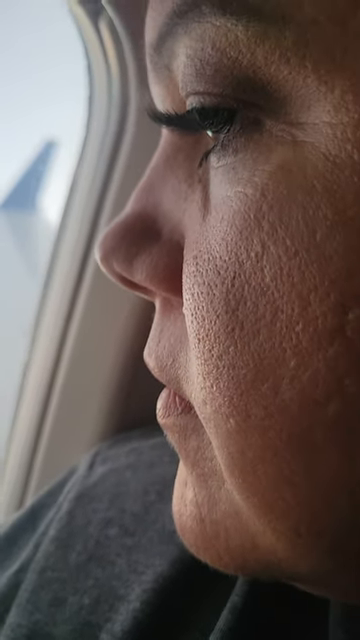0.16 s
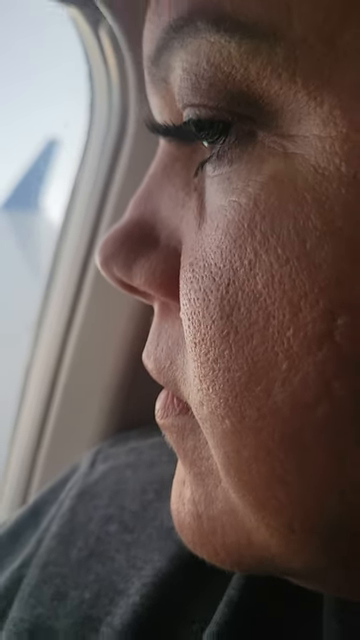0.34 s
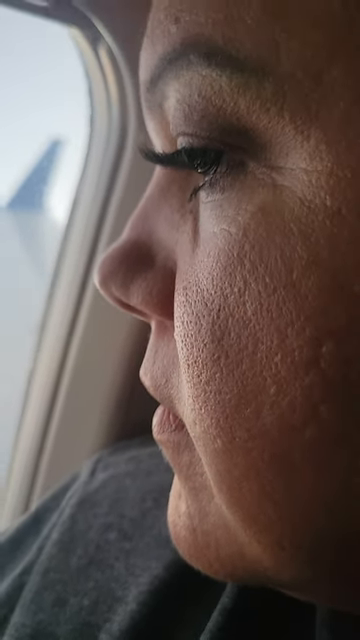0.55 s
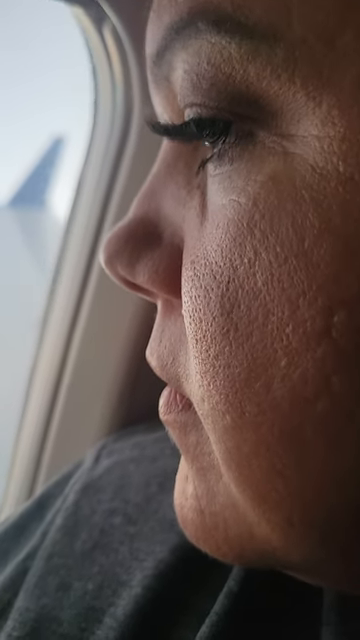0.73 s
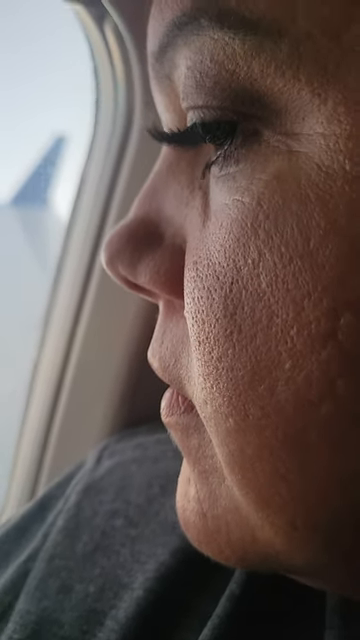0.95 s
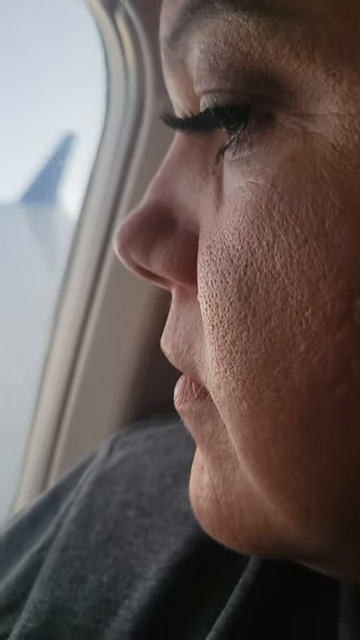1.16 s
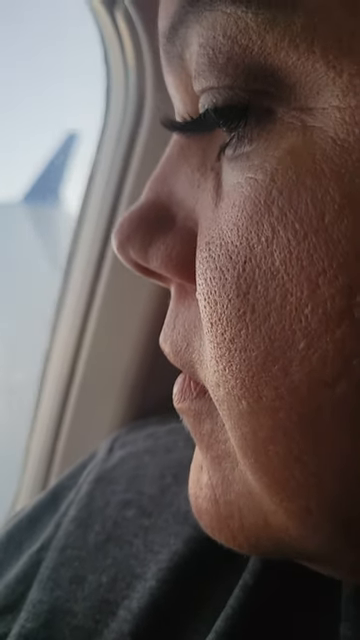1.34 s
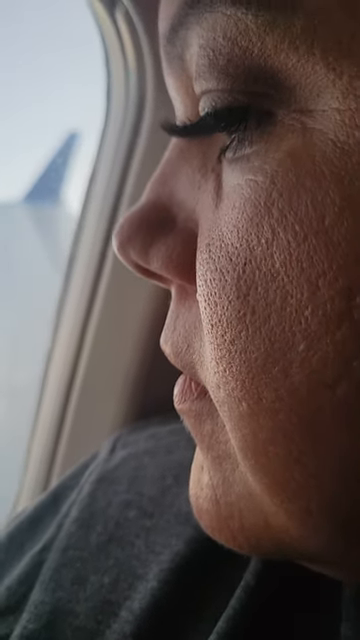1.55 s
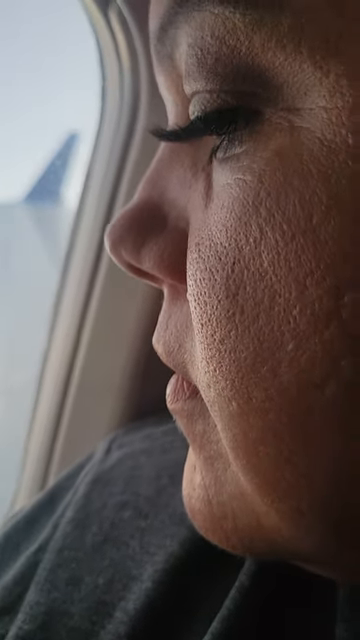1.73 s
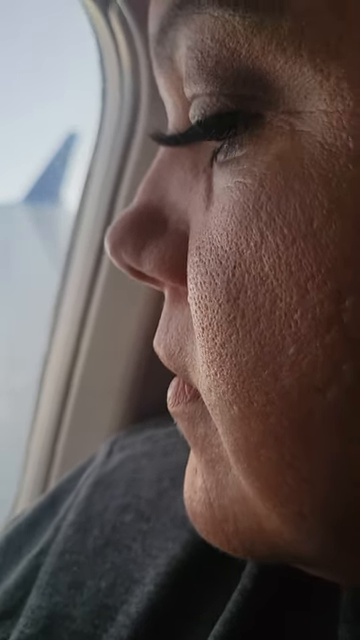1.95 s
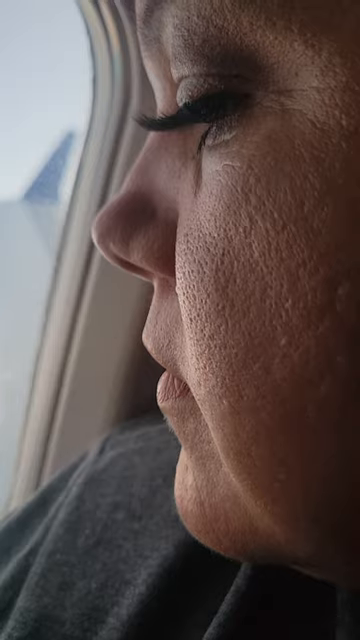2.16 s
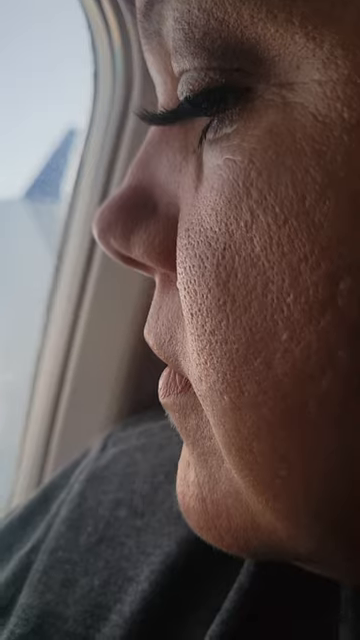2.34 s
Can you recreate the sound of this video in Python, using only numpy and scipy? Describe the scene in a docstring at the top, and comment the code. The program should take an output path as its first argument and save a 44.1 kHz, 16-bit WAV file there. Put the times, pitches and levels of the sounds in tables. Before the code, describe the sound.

Steady low rumble and rushing air inside an airliner cabin, with one small tick.

```python
"""A window seat in a cruising airliner, heard through a stereo pair of microphones.
The engines rumble through the fuselage, air roars along the skin and hisses from the vents,
the ducts ring and fans add faint steady whines. Halfway through, something small close to the
right microphone gives one crisp crackling tick, with soft rustles before and after it
and a faint squeak in the first rustle."""
import sys
import numpy as np
from scipy import signal
from scipy.fft import rfft, irfft, next_fast_len
from scipy.io import wavfile
from scipy.ndimage import map_coordinates

SR = 44100
rng = np.random.default_rng(int(sys.argv[2]) if len(sys.argv) > 2 else 0)


def waveform_to_disk(signal):
    """Save audio, clipped to [-1, 1], as 16-bit WAV at the path in sys.argv[1]."""
    frames = np.transpose(np.atleast_2d(signal))
    scaled = np.clip(frames, -1, 1) * 32767
    samples = np.round(scaled).astype(np.int16)
    wavfile.write(sys.argv[1], SR, samples)


N = 110250

# bright spectrum of the tick and the rustles (frequency [Hz], relative level [dB])
CLOSE_SPECTRUM = [(3000, -20), (4200, -13), (5100, -5), (5800, -13.5), (6850, -3), (7800, -17),
                  (9200, -9.5), (10900, -11), (12000, 2), (12600, 0), (13700, -2), (15000, -7),
                  (15900, -21)]


def amp(db):
    """Decibels to gain."""
    return 10 ** (np.asarray(db) / 20)


def unit(x):
    """Scaled to rms 1."""
    return x / np.sqrt(np.mean(x ** 2) + 1e-20)


def along(points, hz):
    """(frequency [Hz], value) points read on a log axis."""
    frequencies, values = np.transpose(points)
    return np.interp(np.log(hz + 1), np.log(frequencies + 1), values)


def level(points):
    """(time [s], level [dB]) points as a gain per sample."""
    return amp(np.interp(np.arange(N) / SR, *np.transpose(points)))


def bump(middle_s, sigma_s):
    """A bell-shaped rise and fall around a moment."""
    return np.exp(-.5 * ((np.arange(N) / SR - middle_s) / sigma_s) ** 2)


def wobble(rate):
    """A smooth random curve, rate knots a second."""
    knots = rng.standard_normal(int(N * rate / SR) + 4)
    return map_coordinates(knots, [np.arange(N) * rate / SR])


def filtered(x, response):
    """x through a filter whose response is a function of frequency."""
    size = next_fast_len(N + SR // 2)
    return irfft(rfft(x, size) * response(np.fft.rfftfreq(size, 1 / SR)), size)[..., :N]


def rush(colour, likeness):
    """Stereo noise of rms 1; its colour and its left-right likeness are functions of frequency."""
    def mid_side_gains(hz):
        angle = np.arccos(np.clip(likeness(hz), -1, 1)) / 2 * np.ones_like(hz)
        return colour(hz) * np.array([np.cos(angle), np.sin(angle)])
    mid, side = filtered(rng.standard_normal((2, N)), mid_side_gains)
    return unit(np.array([mid + side, mid - side]))


def resonance(centre_hz, width_hz, db, likeness):
    """A narrow band of stereo noise."""
    return amp(db) * rush(lambda hz: 1 / (1 + (2 * (hz - centre_hz) / width_hz) ** 2), lambda hz: likeness)


def air(spectrum, db):
    """Steady turbulent air, reaching the microphones from all sides."""
    # likeness of the air noise at the two microphones (frequency [Hz], correlation [-1 to 1])
    likeness = [(150, 0.77), (260, 0.98), (340, -0.11), (440, 0.13), (540, -0.52), (830, -0.6),
                (1020, -0.47), (1800, -0.66), (2200, 0.53), (3200, -0.25), (5500, 0.0045), (15000, -0.18)]
    return amp(db) * rush(lambda hz: amp(along(spectrum, hz)), lambda hz: along(likeness, hz))


def engines(rumble_db=-18, drone_db=-25.5, drone_hz=107.7, wander=.03):
    """Through the fuselage: a broad low rumble and a slightly unsteady drone, surging together."""
    # engine rumble (frequency [Hz], relative level [dB])
    spectrum = [(20, -25), (31, -18), (42, -5.5), (52, -8), (64, 4.5), (76, -1.5), (90, 4), (112, 1),
                (135, 0), (155, -10.5), (200, -15.5), (400, -65.5)]
    # surges of rumble and drone (time [s], level [dB])
    surges = [(0, 2), (.16, -1), (.22, -3), (.32, -1), (.42, -5.5), (.49, 2), (.58, -2.5), (.79, 1.5),
              (.85, -5.5), (.96, 0), (1.12, 1), (1.19, -4.5), (1.25, 3), (1.38, -4.5), (1.5, 1), (1.61, -1),
              (1.7, 0), (1.9, 3), (1.96, -5.5), (2.03, 5.5), (2.09, -2.5), (2.17, 4.5), (2.28, -6.5),
              (2.36, 2), (2.5, 1.5)]
    rumble = amp(rumble_db) * rush(lambda hz: amp(along(spectrum, hz)), likeness=lambda hz: 0.99)
    pitch_hz = drone_hz * (1 + wander * wobble(12))
    drone = amp(drone_db) * unit(np.sin(2 * np.pi * np.cumsum(pitch_hz) / SR))
    return (rumble + drone) * level(surges)


def cabin_hum():
    """The engines drive a narrow hum in the cabin that comes and goes."""
    # cabin resonance (frequency [Hz], width [Hz], level [dB], left-right likeness [-1 to 1])
    bands = [(249.3, 14.2, -28, 0.38)]
    # rise and fall of the hum (time [s], level [dB])
    swell = [(0, 2), (.2, 2.5), (.38, -9), (.5, 4), (.65, -3.5), (1.15, -7), (1.32, 2), (1.65, -12.5),
             (1.9, 8), (2.15, -2.5), (2.29, 5), (2.36, -2), (2.5, -6)]
    return sum(resonance(*band) for band in bands) * level(swell)


def airflow(roar_top_hz=520):
    """Air along the skin, just outside the window: its low roar swells, its upper range stays even."""
    # airflow on the fuselage (frequency [Hz], relative level [dB])
    spectrum = [(60, -45), (140, -4.5), (210, 1), (285, -2), (315, -2.5), (385, -1.5), (480, -8),
                (570, -9.5), (720, -10), (850, -16.5), (1080, -15.5), (1200, -19), (1420, -17), (1530, -24),
                (1720, -17), (2000, -23), (2120, -25), (2260, -25), (2420, -28.5), (2800, -27), (3150, -35),
                (3800, -36), (6000, -79)]
    # rise and fall of the low roar (time [s], level [dB])
    swell = [(0, 1), (.36, -.7), (.5, 0.8), (.72, -2), (1.0, 0.4), (1.25, -0.3), (1.43, 2), (1.56, -.7),
             (1.7, 1.1), (2.1, -0.9), (2.5, 0)]
    flow = air(spectrum, db=-21.5)
    roar = filtered(flow, lambda hz: 1 / (1 + (hz / roar_top_hz) ** 8))
    return flow + roar * (level(swell) - 1)


def vents(ripple_db=1.94, spacing_hz=55.5):
    """The air vents hiss; cabin reflections lift some frequencies and thin out others."""
    # vent hiss (frequency [Hz], relative level [dB])
    spectrum = [(1500, -32), (3300, 11), (3750, -3), (4200, 7), (4750, 3.5), (6000, 0.5), (6400, 2),
                (6700, -3), (7300, -3.5), (8500, -15.5), (9700, -12), (10900, -12), (12400, -2.5),
                (13700, -3), (14400, -11), (15700, -18)]
    hiss = air(spectrum, db=-46.5)
    knots_db = ripple_db * rng.standard_normal(4096)
    return filtered(hiss, lambda hz: amp(map_coordinates(knots_db, [hz / spacing_hz], mode="mirror")))


def ducts():
    """The air ducts ring in narrow, steady bands."""
    # duct resonances (frequency [Hz], width [Hz], level [dB], left-right likeness [-1 to 1])
    bands = [(485, 13, -42, -0.037), (988, 17, -51.5, 0.038), (1741, 30, -47, -0.5), (2635, 42, -51, 0.048),
             (4700, 100, -59, 0.45), (6405, 100, -61, -0.23)]
    return sum(resonance(*band) for band in bands)


def fans(gain_db=0.5, wander=0.00161, flutter_db=7.5):
    """Thin fan tones that wander a little in pitch and flutter differently at each microphone."""
    # whines of fans and turbines (frequency [Hz], relative level [dB])
    whines = [(862, -52), (1001, -59), (1115, -60), (1378, -56), (1593, -51.5), (1729, -58), (2670, -59),
              (2757, -56.5), (4059, -61), (4139, -68), (6422, -67.5)]
    sound = np.zeros((2, N))
    for hz, db in whines:
        phase = 2 * np.pi * np.cumsum(hz * (1 + wander * wobble(29.86))) / SR
        for channel in range(2):
            tone = np.sin(phase + rng.uniform(0, 2 * np.pi) + wobble(3.9))
            flutter = amp(flutter_db * wobble(7.7))
            sound[channel] += amp(db + gain_db) * unit(tone * flutter)
    return sound


def rustles():
    """Faint bright brushes close by, as of clothing."""
    # soft rustles (middle time [s], half length [s], level [dB])
    brushes = [(.72, .045, -57), (1.265, 0.047, -55), (1.535, 0.042, -50.5)]
    envelope = sum(amp(db) * bump(middle_s, half_s) for middle_s, half_s, db in brushes)
    return envelope * rush(lambda hz: amp(along(CLOSE_SPECTRUM, hz)), likeness=lambda hz: 0)


def squeak():
    """A brief thin squeak, close and centred, during the first rustle."""
    return bump(middle_s=.745, sigma_s=.02) * resonance(centre_hz=5430, width_hz=110, db=-56, likeness=1)


def tick(snap_t60_s=0.012, far_db=-9.5, far_delay_s=.002, cabin_t60_s=0.082):
    """A few tiny snaps close to the right microphone; seats and panels answer briefly."""
    # snaps within about a hundredth of a second (time [s], level [dB])
    snaps = [(1.3176, -22.5), (1.319, -21), (1.3222, -20), (1.3285, -29)]
    t = np.arange(N) / SR
    envelope = sum((t >= start) * amp(db - 60 * np.abs(t - start) / snap_t60_s) for start, db in snaps)
    near = envelope * unit(filtered(rng.standard_normal(N), lambda hz: amp(along(CLOSE_SPECTRUM, hz))))
    far = amp(far_db) * filtered(near, lambda hz: np.exp(-2j * np.pi * hz * far_delay_s))
    tail = rng.standard_normal((2, SR // 2)) * amp(-60 * t[:SR // 2] / cabin_t60_s)
    echo = signal.fftconvolve(near[None], tail / np.linalg.norm(tail[0]), axes=1)[:, :N]
    echo_db = [[-8.5], [-6]]  # left, right
    return np.array([far, near]) + amp(echo_db) * echo


def microphones(hz):
    """Level and phase of the cabin's sound at the left and the right microphone."""
    # left microphone over right (frequency [Hz], level [dB])
    balance = [(60, -3), (125, 0), (200, -4.5), (380, -0.9), (800, -1.5), (1100, 0.5), (1500, -6),
               (2400, -0.3), (3400, -1), (4400, -2.8), (6400, -2.5), (7300, 1), (8600, 8), (10800, 5.5),
               (12400, -1.5), (15000, -4)]
    # lead of the right microphone (frequency [Hz], phase [rad])
    right_lead = [(150, -0.12), (280, 0.021), (620, -0.39), (1000, 0.4), (1450, -0.062), (1850, 0.16),
                  (2050, 0.96), (2600, 0.43)]
    half = np.array([[.5], [-.5]])
    return amp(half * along(balance, hz)) * np.exp(-1j * half * along(right_lead, hz))


def scene():
    """From the seat: the cabin's noise all around, the small sounds close by."""
    cabin = engines() + cabin_hum() + airflow() + vents() + ducts() + fans()
    return filtered(cabin, microphones) + tick() + rustles() + squeak()


def record(dry, top_hz=15750):
    """The recorder keeps nothing above its band limit."""
    return filtered(dry, lambda hz: hz < top_hz)


dry = scene()
out = record(dry)
waveform_to_disk(out)
```